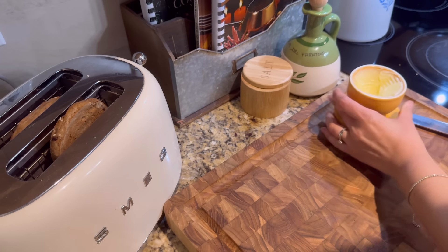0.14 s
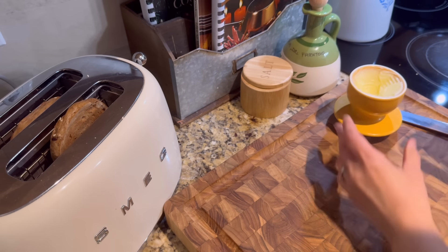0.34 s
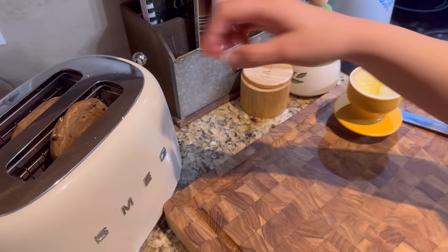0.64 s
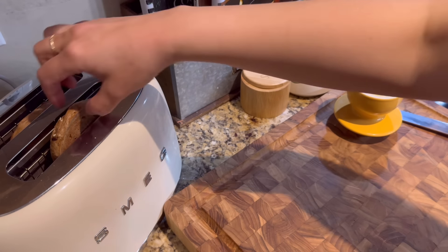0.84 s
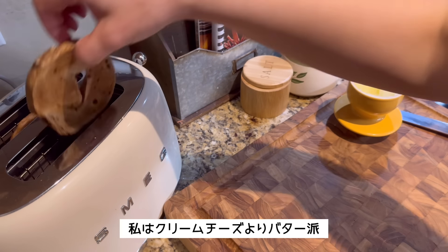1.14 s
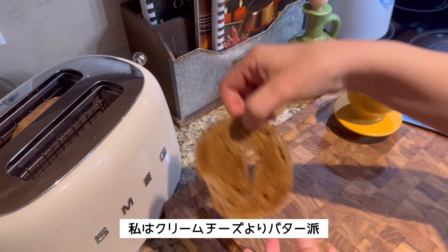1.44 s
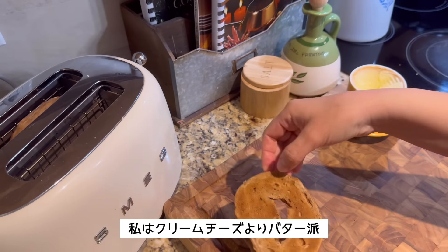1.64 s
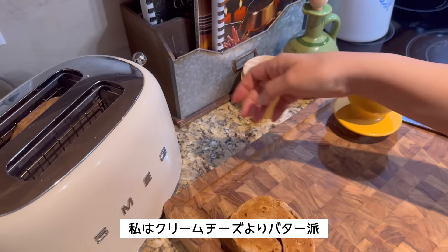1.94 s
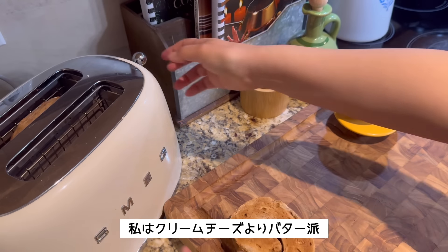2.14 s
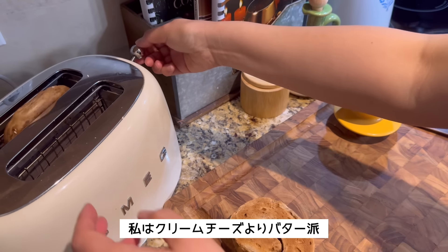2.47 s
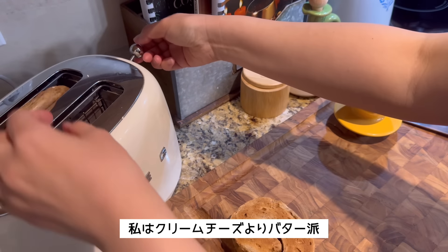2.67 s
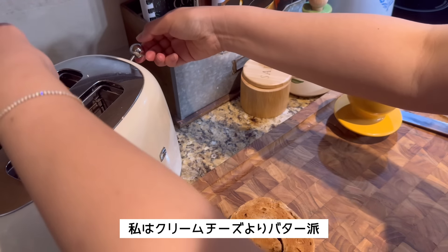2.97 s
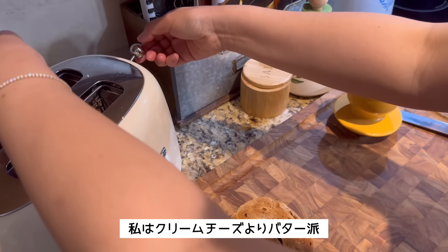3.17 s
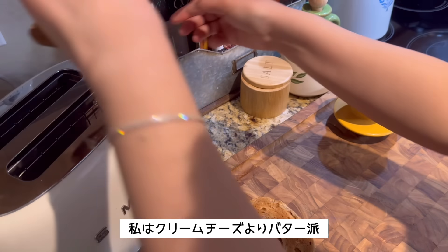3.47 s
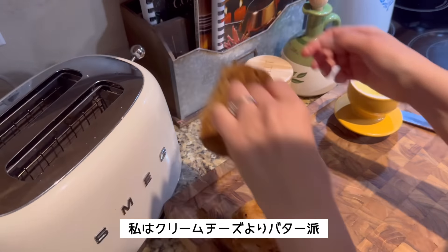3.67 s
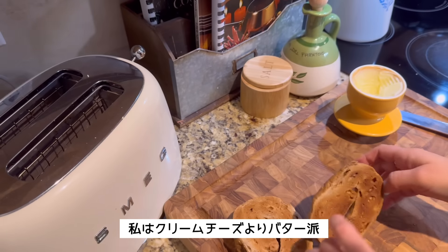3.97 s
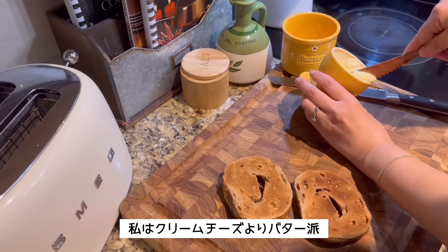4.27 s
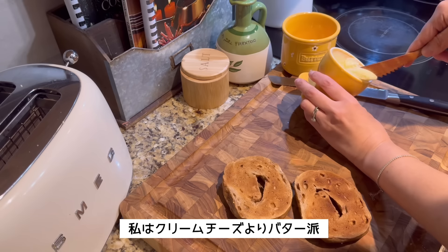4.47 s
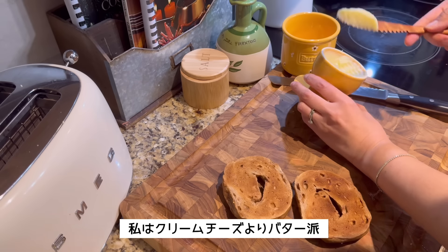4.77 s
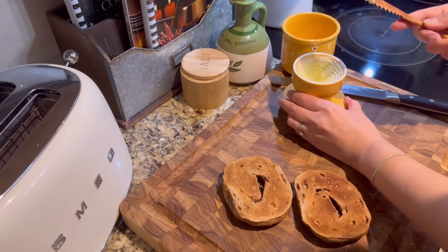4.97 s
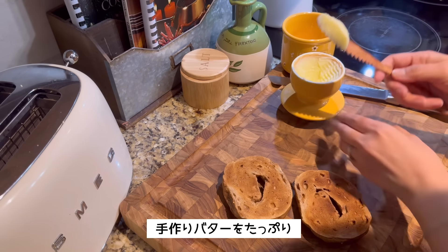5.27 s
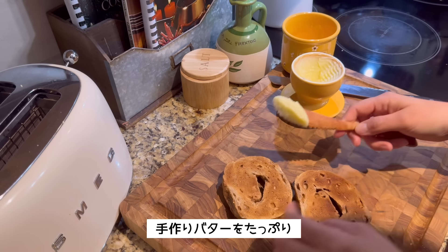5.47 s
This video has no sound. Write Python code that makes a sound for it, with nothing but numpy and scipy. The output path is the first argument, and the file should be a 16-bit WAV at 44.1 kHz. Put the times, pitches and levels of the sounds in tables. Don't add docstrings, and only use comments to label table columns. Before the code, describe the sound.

A close stereo kitchen scene with short reflections from hard walls, a low steady fridge hum and soft room air. It opens on the dying ring of a saucer and very faint woody touches. Around 1.0 s crust scrapes lightly in a sheet-metal slot; at 1.7 s toast drops on a wooden board with a dry knock and small bounces. At 2.3 s the toaster lever snaps, the loudest metallic clack so far, ringing briefly until a duller catch at 2.53 s. From 3.2 to 3.4 s crust rasps and thin metal rattles, followed by tiny ticks. Two firm board knocks come near 3.77 s, then scratchy sliding to 4.2 s. There the room abruptly drops to a faint low murmur; hum and rumble swell back, louder, from about 4.6 s. At 4.96 s a heavy stoneware crock lands with a dull, hard, ringing clunk, then soft rubbing and faint touches.

```python
import sys
import numpy as np
from scipy import signal
from scipy.fft import rfft, irfft
from scipy.io import wavfile
from scipy.ndimage import uniform_filter1d

SR = 44100
rng = np.random.default_rng(int(sys.argv[2]) if len(sys.argv) > 2 else 0)


def level_to_linear(level):
    exponent = np.asarray(level, float) / 20
    return 10 ** exponent


def store_wav(level_fs):
    pcm = np.round(np.clip(np.atleast_2d(level_fs), -1, 1) * 32767)
    wavfile.write(sys.argv[1], SR, pcm.T.astype(np.int16))


N = 247401

# (time [s], peak level [dB], weight [dB], crispness [dB])
TOASTER_HITS = [(0.9914, -49, 5.5, -14), (1.0136, -47, 7.5, -14), (3.1103, -68, 24, -15.5),
                (3.1326, -44, 6.5, -9), (3.309, -40, 2, -10.5), (3.3265, -33, 1.5, -2.5),
                (3.331, -37.5, 0, -5), (3.3355, -30, -2, -6.5), (3.341, -41.5, -2, -8),
                (3.348, -39, 2, -12), (3.357, -39, 0, -10.5), (3.3684, -45, 0, -10),
                (3.3894, -47, 11.5, -15.5), (3.5324, -50.5, 10.5, -7.5)]
CRUST_HITS = [
    (1.054, -40.5, -13, 9.6),
    (1.062, -45, -15, 10.5),
    (1.079, -50.5, -8, 3.5),
    (1.105, -50, -8.5, 5.5),
    (3.2405, -37, -12.5, 5.1),
    (3.2967, -43, -21, 6.2),
]
TICKS = [
    (3.6454, -56, -1, -13.5),
    (3.6814, -59, -7, -11.5),
    (3.7116, -50.5, -8, -4.5),
    (3.74, -52.5, -6, -13),
]
SNAP_HITS = [
    (2.2742, -37.5, -7.5, -12.5),
    (2.3005, -28.5, 0.5, -3.5),
    (2.307, -37, -2, -9),
    (2.3455, -13, -11.5, -0.5),
    (2.3495, -13, -6, -2),
    (2.3554, -13.5, -10, -9.5),
    (2.367, -27, -4.5, -6),
]
CATCH_HITS = [
    (2.5299, -26, -4.5, -8),
    (2.5519, -42, 9, -25),
]
DROP_HITS = [
    (1.7162, -32.5, 7.5, -3.5),
    (1.737, -19, -2.5, -2.5),
    (1.779, -44.5, 12.5, -7),
    (1.8095, -33.5, 4, -16),
    (1.8343, -52.5, 9, -3),
]
BOARD_HITS = [(0.172, -54, 17.5, -5), (0.241, -56, 10.5, -4.5), (0.293, -58.5, 12, -5),
              (0.3646, -54.5, 15, -7.5), (3.7547, -24, 6.5, -2), (3.7897, -23, 8, -6),
              (3.8511, -30.5, -19, -7.5), (3.8921, -38, 0.5, -10), (3.9091, -50, -13, -11),
              (3.9294, -46.5, 1, -2), (4.028, -56, 1, 5), (4.1045, -47, 4.5, 4), (4.136, -40, 8, -3),
              (4.205, -50.5, 16, -5)]
CROCK_HITS = [
    (4.947, -45, -12.5, -21.5),
    (4.9588, -11.5, -2, -17),
    (5.303, -61, -8.5, 11),
    (5.535, -56.5, 11, -1),
]
# (time [s], peak level [dB], weight [dB], crispness [dB])
HANDLING_HITS = [(0.498, -58, 7, -12), (0.59, -54, 6, -10), (0.746, -61.5, 3.5, -10),
                 (0.787, -59, 5.5, -10), (0.959, -52, 4, -8), (1.26, -56.5, -2, 0.5), (1.352, -52.5, 5, -9),
                 (1.467, -54.5, 14, -10), (1.509, -61, 9.5, -12), (1.588, -70, 3.5, -8),
                 (1.619, -62, 3, -10), (1.672, -56, -4, 0)]

# (pitch [Hz], level [dB], time to fade by 60 dB [s])
TOASTER = [(754, -10.0, 0.33), (1710, -9.0, 0.32), (2170, -15.5, 0.162), (2563, -20.5, 0.31),
           (2640, 1.5, 0.077), (2730, -1.0, 0.16), (3880, -22.5, 0.19), (3893, -19, 0.16),
           (4920, -8.0, 0.45), (5200, -32.5, 0.13), (5640, -24.0, 0.48), (6030, -1.5, 0.023),
           (6760, -26.5, 0.37), (8260, -35, 0.22), (10100, -8.0, .12), (13080, -1.5, 0.097)]
SNAP = [(744, -4, 0.14), (1010, -19.5, 0.087), (1426, -14, .1), (1884, -14.5, .3), (2500, -11.0, .1),
        (2750, -6.5, 0.054), (2824, -15.5, .1), (3284, -15.0, 0.1), (3385, -13.5, .1), (3820, -13.5, .14),
        (4400, -21.5, .3), (5577, -20, .25), (6239, -5.5, .074), (6465, -16, 0.14)] + TOASTER[-2:]
CATCH = [(744, -16, 0.13), (1680, -17, 0.41), (1820, -19, 0.062), (2270, -3, 0.07), (2594, -6, 0.104),
         (2800, -0.5, 0.085), (3570, -6, 0.06)]
DROP = [(477, 1, 0.12), (1110, -32, 0.16), (1294, -24, 0.22), (1690, 10, 0.0248), (2006, -2, 0.0385),
        (2110, -23, 0.067), (2930, -8, 0.022), (3280, -15, 0.046)]
BOARD = [(490.4, 0, 0.45), (730, -0.5, 0.4), (1500, -9, 0.099), (1810, -12.5, 0.21), (2000, -1, 0.081),
         (2255, -11.5, 0.3), (2590, -50, 0.15), (3520, -73, 0.1113)]
CROCK = [(372, 1.5, 0.091), (503, -1, 0.087), (617.3, -2.5, 0.13), (728, 7, 0.061), (808.6, 0.5, 0.092),
         (845, -6.5, 0.22), (1480, -9, 0.34), (1100, 1, 0.1), (1213, 3, 0.08), (1398, 2, 0.112),
         (1530, -15.5, 0.3), (1780, -7, 0.056), (2043.5, -6.5, 0.26), (2200, -17.5, 0.29),
         (2440, -9.5, 0.11), (2870, -25.5, 0.357), (3240, -15, 0.091), (4020, -34.5, 0.11)]
SAUCER = [(860, 1, .15), (1480, -2, .36), (2085, -2, .22), (2435, 0, .15), (2750, -10, .25),
          (3515, -10, .14), (4344, -18, .2), (4990, -14, .1), (5450, -15, .12), (6820, -9, .25)]
# (pitch [Hz], level [dB], time to fade by 60 dB [s])
SNAP_TAIL = [(790, 0, .21), (1136, -5.5, .23), (1798, -2, .2), (2180, -8.5, .23), (2487, -5.5, .27),
             (2692, 1.5, 0.13), (2900, -9.5, .32), (3994, -12.5, .26), (4716, -13, .27), (5230, -18, .5),
             (5550, -15, .34), (6680, -14, .28)]
CROCK_TAIL = [(464, -16.5, 0.18), (629, -8, .23), (740, -10, .4), (856, -17, 0.5), (925, -12, .34),
              (1152, -6, 0.17), (1430, -9.5, .14), (1483, -11, 0.652), (1522, 2, .3), (1670, -19, .5),
              (2051, -12, .5), (2200, -13, 0.395), (2880, -28, .45)]

# (time [s], level [dB], pitch [Hz],
# time to fade by 60 dB [s])
THUDS = [(1.738, -22, 156.4, 0.055), (2.346, -23, 310, 0.062), (2.529, -24.5, 331, 0.0367),
         (3.755, -27, 801, 0.056), (3.79, -26, 603, 0.048), (4.64, -68, 730, 0.4),
         (4.9586, -10.5, 783, 0.038), (4.9586, -15.5, 742, 0.11), (4.9586, -15.5, 1225, 0.052),
         (0.0, -59, 2085, 0.35), (0.295, -53.5, 900, .15), (0.176, -51, 1000, .08),
         (4.944, -41.5, 1530, .08), (4.959, -20, 620, 0.06), (2.355, -22.5, 2690, 0.048),
         (2.53, -31, 2800, 0.062), (2.531, -32, 2340, .045), (1.738, -30, 1890, 0.026),
         (1.738, -34, 775, .04), (4.9583, -28, 1980, 0.08), (4.96, -37.5, 2200, 0.3),
         (0.152, -40, 300, 0.09), (0.366, -41, 312, 0.12), (0.315, -59, 1760, 0.25),
         (1.741, -23.5, 63.4, 0.4), (3.759, -28, 84, 0.15), (3.788, -21, 152.6, 0.067),
         (3.794, -24, 62, 0.67), (4.78, -39.5, 285.5, 0.43), (4.957, -27, 77.6, 0.13),
         (4.961, -26, 231, 0.1), (5.132, -27, 69.6, 0.28)]

# (peak time [s], level [dB], rise [s per 20 dB], fall [s per 20 dB], sizzle [dB])
RUBS = [(0.0, -45, .01, 0.1652, -10), (0.17, -65.5, 0.084, 0.11, -2), (1.03, -58, 0.12, -0.18, -15),
        (1.062, -53.5, 0.014, -0.1, -6.5), (1.475, -74, 0.01, -0.1, -4.5), (1.6, -91, 1, 1, 6),
        (2.45, -77, 0.096, 0.6, 11.5), (3.144, -79, 0.089, 0, -19.5), (3.243, -50, 0.0085, 0.1481, 9),
        (3.3, -52, 0.033, 0.02, -11.5), (3.329, -39, 0.0063, 0.08, -14.5), (1.115, -70, 0.054, 0.5, -1),
        (3.55, -54.5, 0.034, 0, -13), (3.7, -79, 0.21, 1, 3), (4.228, -75.5, 0.011, 0.5, -16),
        (5.13, -64, 0.141, 0.34, -22.5), (5.23, -59, 0.066, 0.28, -16), (5.3, -57.5, 0.037, 0.22, -16.5)]
SLIDE = [
    (3.915, -51, .018, .05, -10),
    (3.95, -52.5, .04, .04, -10),
    (3.98, -55, .04, .008, -10),
    (4.064, -61, .008, .04, -7),
    (4.085, -53, .025, .06, -7),
    (4.12, -61, .04, .025, -7),
]
BRUSH = [
    (4.223, -64.5, 0.006, 0.08, 2.5),
    (4.66, -80, 0.012, -1.5, -38),
    (4.72, -74.5, 0.045, 0, -40),
    (4.81, -71.5, 0.066, -0.5, -36.5),
    (4.94, -65.5, 0.123, 0.8, -33),
]
# (centre [Hz], width [Hz], level [dB])
SLIDE_BANDS = [(2500, 320, -1), (4470, 200, 5), (5740, 220, 1), (3510, 300, -4), (6800, 1800, 1)]

# (peak time [s], level [dB], rise [s per 20 dB], fall [s per 20 dB])
SHAKES = [
    (1.83, -52, 0.95, 2),
    (2.45, -56, .25, -1),
    (3.84, -55, 0.17, -1.1),
    (4.14, -70, 0.091, -3.93),
    (4.679, -46, 0.28, -0.1),
    (4.85, -60, 0.34, 0),
    (5.14, -48, 0.2, 1),
    (5.44, -57.5, .25, -1.5),
]
STIRS = [
    (0.0, -78, 0.092, -2),
    (1.1, -67, 0.092, 0.5),
    (1.55, -77, 0.12, 10),
    (2.4, -51.5, .12, 0.65),
    (3.35, -66.5, 0.064, -1.5),
    (4.969, -48, 0.13, -1.1),
    (5.4, -66.5, .3, 8),
]
# (time [s], hum level [dB])
FRIDGE = [(0.0, -49), (1.59, -49), (1.83, -47), (2.66, -49.5), (3.16, -47), (3.45, -50.5), (3.96, -46.5),
          (4.06, -54.5), (4.21, -49), (4.4, -48), (4.6, -41.5), (4.76, -37), (4.95, -36.5), (5.14, -40),
          (5.61, -42.5)]
# (time [s], level [dB])
SWELL = [
    (4.21, 10),
    (4.215, -19),
    (4.5, -15),
    (4.62, -8.5),
    (4.7, -1.5),
    (4.78, 5.5),
    (4.95, 6.5),
    (5.2, 3),
    (5.6, 6),
]
# (pitch [Hz], level [dB per Hz])
AIR = [(88, -35.5), (150, 0), (186, -1.5), (205, -13.5), (279, 1), (346, -7), (613, -14.5), (810, -19),
       (1870, -24), (7500, -44), (9750, -73), (16500, -120)]
LULL = [(24, -38.5), (40, -22.5), (69, -11.5), (87, -28), (145, -6), (177, 0.5), (206, -12.5), (604, -28.5),
        (1500, -54.5), (1950, -82), (3300, -120)]
# (pitch [Hz], level [dB])
TREBLE_COLOUR = [(6500, -1.29), (8300, -4.5), (9800, -2), (12200, 1.5), (14000, -2), (16000, -5.5)]

LULL_START_S, LULL_END_S = 4.212, 4.7
STEP = 32
WIDE_HZ = 250., 1000., 4000., 8000., 16200.


def colour(x, points):
    n = x.shape[-1]
    hz, db = np.transpose(points)
    f = np.maximum(np.fft.rfftfreq(n, 1 / SR), 1)
    return irfft(rfft(x) * level_to_linear(np.interp(np.log(f), np.log(hz), db)), n)


def unit(x):
    return x / np.sqrt(np.mean(x ** 2))


def band(x, lo_hz, hi_hz):
    sos = signal.butter(4, [lo_hz, hi_hz], "band", fs=SR, output="sos")
    return unit(signal.sosfilt(sos, x))


def walk(rate):
    hold = int(SR / rate)
    levels = np.repeat(rng.standard_normal(N // hold + 1), hold)
    return unit(uniform_filter1d(levels, hold)[:N])


def pair(n, alike):
    mid, side = rng.standard_normal((2, n))
    a = np.clip(alike, 0, 1)
    return np.sqrt((1 + a) / 2) * mid + np.sqrt((1 - a) / 2) * side * np.array([[1], [-1]])


def add(out, x, s):
    i = int(s * SR)
    out[:, i:i + x.shape[1]] += x[:, :N - i]


def onset(t, rise_s):
    return 1 - np.exp(-t / rise_s)


def decay(t, t60):
    return np.exp(-np.log(1000) * t / t60)


def stroke(s, db, rise_s, fall_s, steep=1):
    late = np.arange(0, N + STEP, STEP) / SR - s
    same_side = (late + s < LULL_START_S) == (s < LULL_START_S)
    with np.errstate(divide="ignore", invalid="ignore"):
        away = np.maximum(late / np.abs(fall_s), -late / np.abs(rise_s))
    return same_side * level_to_linear(db - 20 * steep * np.clip(away, 0, 8))


def fine(gain):
    return np.interp(np.arange(N) / STEP, np.arange(len(gain)), gain)


def ring(modes, n, damp, spread):
    hz, db, t60 = np.transpose(modes)[:, :, None]
    t = np.arange(n) / SR
    beat = 1 + .5 * np.cos(2 * np.pi * hz * 0.016 * rng.random(hz.shape) * t)
    phase = spread * rng.standard_normal((2, len(hz), 1))
    tones = np.sin(2 * np.pi * hz * t + phase)
    return np.sum(level_to_linear(db) * beat * decay(t, damp * t60) * tones, axis=1)


def contacts(hits, body, pan_db, ring_db, rise_s, blow_t60, shiver_t60, gritty_db, sizzle_db, shiver_db,
             edges_hz=WIDE_HZ):
    out, n = np.zeros((2, N)), body.shape[1]
    t = np.arange(n) / SR
    rise = onset(t, rise_s)
    body = band(body * rise, edges_hz[0], edges_hz[4])
    pan = np.array([[pan_db], [-pan_db]]) / 2
    for s, peak_db, weight_db, crisp_db in hits:
        grit = level_to_linear(gritty_db * np.repeat(rng.standard_normal(n // 40 + 1), 40)[:n])
        blow = rise * decay(t, blow_t60) * grit
        shiver = level_to_linear(shiver_db - 0.3945 * peak_db) * np.sqrt(grit)
        push = blow + shiver * rise * decay(t, shiver_t60)
        low, middle, crisp, sizzle = [band(push * pair(n, 0.12), *edges_hz[k:k + 2]) for k in range(4)]
        rattle = level_to_linear(weight_db) * low + middle + level_to_linear(crisp_db) * (crisp + level_to_linear(sizzle_db) * sizzle)
        strike = push * rng.standard_normal(n)
        strike *= 0.55 / np.sqrt(np.sum(strike ** 2))
        strike[int(rise_s * SR)] += 1
        modes = signal.fftconvolve(body, strike[None], axes=1)[:, :n]
        sound = rattle / np.max(np.abs(middle)) + level_to_linear(ring_db) * modes / np.max(np.abs(modes))
        add(out, sound * level_to_linear(peak_db + pan), s - rise_s)
    return out


def toaster():
    n = SR // 4
    out = contacts(TOASTER_HITS, ring(TOASTER, n, 0.174, 1.0), pan_db=-0.65, ring_db=-5.0, rise_s=0.0015,
                   blow_t60=0.069, shiver_t60=0.436, gritty_db=3.1, sizzle_db=6.85, shiver_db=-33.5)
    out += contacts(CRUST_HITS, ring(TOASTER, n, 0.18, 0.78), pan_db=-0.51, ring_db=-3.0, rise_s=0.0023,
                    blow_t60=0.15, shiver_t60=0.147, gritty_db=3.8, sizzle_db=9.44, shiver_db=-2.5)
    out += contacts(TICKS, ring(TOASTER, n, 0.2, 0.9), pan_db=-0.6, ring_db=-6.0, rise_s=0.0006,
                    blow_t60=0.051, shiver_t60=0.27, gritty_db=3.6, sizzle_db=21.9, shiver_db=-28.5)
    out += contacts(SNAP_HITS, ring(SNAP, n, 0.66, 0.7), pan_db=-0.65, ring_db=-4.0, rise_s=0.00083,
                    blow_t60=0.037, shiver_t60=0.38, gritty_db=3.0, sizzle_db=8, shiver_db=-25.5)
    return out


def handling():
    return contacts(HANDLING_HITS, ring(BOARD, SR // 8, 0.15, 0.5), pan_db=-1.6, ring_db=-7.0, rise_s=0.0007,
                    blow_t60=0.035, shiver_t60=0.15, gritty_db=4.0, sizzle_db=3.0, shiver_db=-37)


def lever_after_snap():
    n = SR // 4
    out = np.zeros((2, N))
    add(out, level_to_linear(-36) * ring(SNAP_TAIL, 2 * n, 1.05, 0.6), SNAP_HITS[5][0])
    return out + contacts(CATCH_HITS, ring(CATCH, n, 0.336, 0.49), pan_db=-0.38, ring_db=-4.5, rise_s=0.001,
                          blow_t60=0.04, shiver_t60=0.29, gritty_db=2.8, sizzle_db=4.73, shiver_db=-33)


def board():
    n = SR // 4
    drop = contacts(DROP_HITS, ring(DROP, n, 0.21, 0.34), pan_db=-4.0, ring_db=-1.12, rise_s=0.00043,
                    blow_t60=0.026, shiver_t60=.22, gritty_db=5.2, sizzle_db=5.0, shiver_db=-27.5)
    shift = contacts(BOARD_HITS, ring(BOARD, n, 0.18, 0.192), pan_db=-5.0, ring_db=-0.21, rise_s=0.00023,
                     blow_t60=0.034, shiver_t60=0.222, gritty_db=5.3, sizzle_db=5.9, shiver_db=-20.5)
    shift[:, int(LULL_START_S * SR):] = 0
    return drop + shift


def crock():
    n = SR // 4
    out = contacts(CROCK_HITS, ring(CROCK, n, 0.68, 0.25), pan_db=-5.5, ring_db=5.7, rise_s=0.00024,
                   blow_t60=0.096, shiver_t60=0.52, gritty_db=5.0, sizzle_db=-10.5, shiver_db=-23.5,
                   edges_hz=(420., 900., 2300., 5000., 13000.))
    tail_gain = level_to_linear(-31 + np.array([[-1.5], [1.5]]))
    add(out, tail_gain * ring(CROCK_TAIL, 2 * n, 1.087, 0.35), CROCK_HITS[1][0])
    return out


def saucer():
    out = np.zeros((2, N))
    tone = [(900, -3.5), (1500, -1), (2600, -2), (3500, -4), (5500, -3.5), (6800, -8)]
    add(out, level_to_linear(-42) * colour(ring(SAUCER, SR // 4 * 2, 1.7, 0.75), tone), 0)
    return out


def rubbing():
    crumbs = pair(N, 0.12) * level_to_linear(1.6 * np.minimum(rng.exponential(size=N), 6.5))
    rasp = unit(colour(crumbs, [(300, -24.0), (700, 11), (2500, 5.0), (4500, -7.0), (7000, -1.5), (8200, -22.5)]))
    singing = 0
    for hz, width_hz, db in SLIDE_BANDS:
        patchy = level_to_linear(db + 1.3 * walk(45))
        singing = singing + patchy * band(crumbs, hz - width_hz / 2, hz + width_hz / 2)
    slide = unit(singing + 0.58 * np.roll(rasp, N // 3, axis=1))
    brush = band(crumbs, 1593.0, 2910.0)
    sizzle = band(crumbs, 7900.0, 15800.)
    out = 0
    for table, grain in (RUBS, rasp), (SLIDE, slide), (BRUSH, brush):
        gain = sum(stroke(*row[:4]) for row in table)
        top = sum(level_to_linear(row[4] + 4.0) * stroke(*row[:4], steep=1.9) for row in table)
        out = out + fine(gain) * grain + fine(top) * sizzle
    return out * level_to_linear(1.7 * walk(120) + 1.0)


def thuds():
    out, t = np.zeros((2, N)), np.arange(SR // 2) / SR
    for s, db, hz, t60 in THUDS:
        flex = onset(t, 0.00092) * decay(t, t60) * np.sin(2 * np.pi * hz * t)
        add(out, level_to_linear(db) * flex * np.ones((2, 1)), s)
    struck_s, caught_s, lever_hz = 2.352, 2.528, 431
    held = np.exp(-np.maximum(t - (caught_s - struck_s), 0) / 0.072)
    tone = held * decay(t, .62) * np.sin(2 * np.pi * lever_hz * t + np.array([[0], [.3]]))
    add(out, level_to_linear(-26.5) * tone, struck_s)
    return out


def kitchen_echo(near):
    n = SR // 3
    t = np.arange(n) / SR
    walls = rng.standard_normal((2, n)) * decay(t, 0.46) * (t > .003)
    walls = colour(walls, [(200, -5.0), (1500, 5.0), (6000, 2.0), (14000, -9.0)])
    walls = walls / np.sqrt(np.sum(walls ** 2) / 2)
    jump = int(LULL_START_S * SR)
    out = np.zeros((2, N))
    for a, b in (0, jump), (jump, N):
        middle = near[:, a:b].mean(axis=0)[None]
        out[:, a:b] = level_to_linear(-15) * signal.fftconvolve(middle, walls, axes=1)[:, :b - a]
    return out


def fridge(t, swell_db):
    hum = unit(np.sin(2 * np.pi * 120.3 * t) + 0.27 * band(pair(N, 0.86), 108.26, 144.3))
    hum_db = np.interp(t, *np.transpose(FRIDGE)) + 0.81 * swell_db
    return level_to_linear(hum_db - 0.5) * hum


def rumble(swell_db):
    shaken = level_to_linear(-60 + 0.43 * swell_db) + fine(sum(stroke(*row) for row in SHAKES))
    return level_to_linear(2.5) * shaken * band(pair(N, 1.0), 45., 102.56) * level_to_linear(0.5 * walk(13.0))


def room_air(swell_db):
    low, high = colour(pair(N, 1.0), AIR), colour(pair(N, 0), AIR)
    low, high = (v * level_to_linear(1.2 * walk(9)) for v in (low, high))
    split = signal.butter(2, 400, fs=SR, output="sos")
    air = unit(signal.sosfilt(split, low) + high - signal.sosfilt(split, high)) * level_to_linear(-0.67)
    return (level_to_linear(-58 + swell_db) + fine(sum(stroke(*row) for row in STIRS))) * air


def hiss(t):
    noise = unit(colour(pair(N, 0), [(5000, -17.0), (8500, -0.5), (11000, -2.0), (15500, -10.0)]))
    muted = (t < 4.765) * np.clip((t - LULL_START_S) / 0.023, 0, 1)
    return level_to_linear(-76 + 5.0 - 17.0 * muted) * noise


def room():
    t = np.arange(N) / SR
    swell_db = np.interp(t, *np.transpose(SWELL))
    lean = level_to_linear(np.array([[.8], [-.8]]))
    return lean * (fridge(t, swell_db) + rumble(swell_db)) + room_air(swell_db) / lean + hiss(t)


def lull():
    t = np.arange(N) / SR
    gate = (t > LULL_START_S) * np.clip((LULL_END_S + 0.18 - t) / 0.075, 0, 1)
    return level_to_linear(-55.5 + 2.5) * gate * unit(colour(pair(N, 0.43), LULL))


def scene():
    near = toaster() + handling() + lever_after_snap() + board() + crock() + saucer() + rubbing()
    return near + kitchen_echo(near) + thuds() + room() + lull()


def low_pass(x):
    return signal.sosfilt(signal.butter(12, 16990, fs=SR, output="sos"), x)


def record(dry):
    spec, f = rfft(colour(dry, TREBLE_COLOUR)), np.fft.rfftfreq(N, 1 / SR)
    late = -spec[0] * np.exp(-2j * np.pi * f * 9.8 / SR)
    turn = np.pi / 2 * np.clip((f - 8000) / 500 + .5, 0, 1)
    spec[1] = np.sin(turn) * late + np.cos(turn) * spec[1]
    spec *= level_to_linear(-np.clip((f - 15900) / 30, 0, 80))
    spec *= f ** 2 / (f ** 2 + 35.0 ** 2)
    return low_pass(irfft(spec, N))


dry = scene()
out = record(dry)
store_wav(out)
```